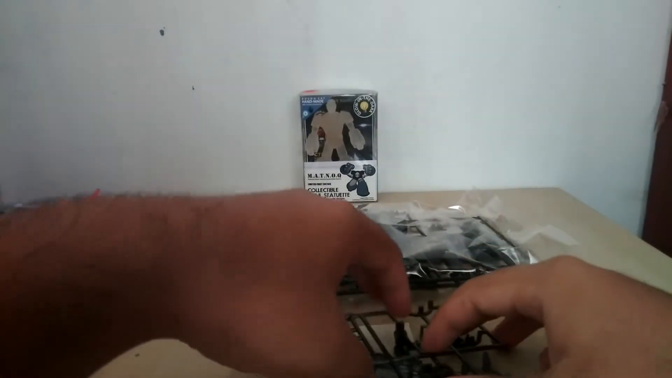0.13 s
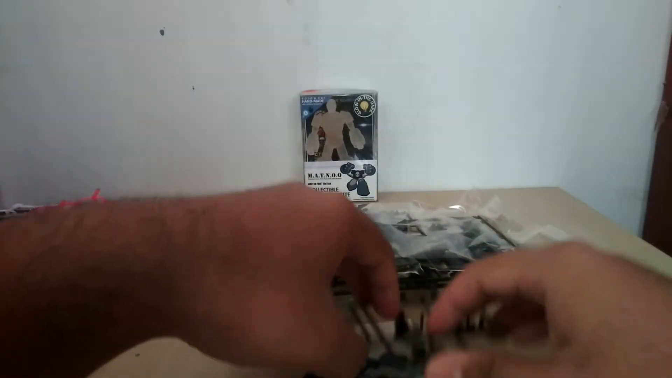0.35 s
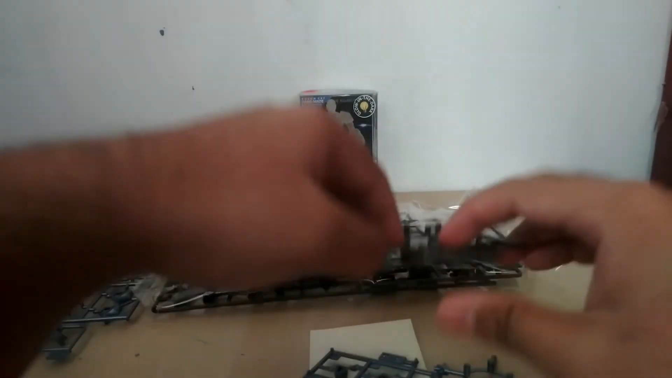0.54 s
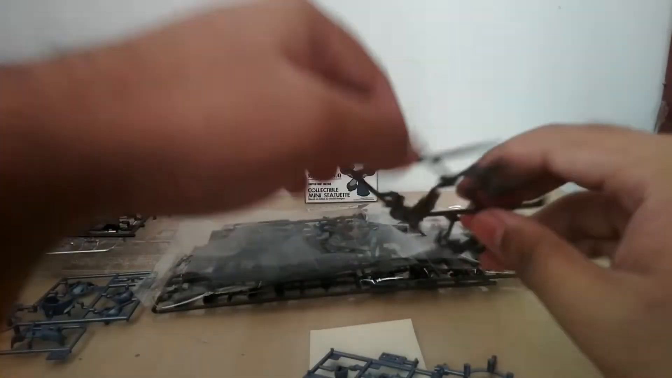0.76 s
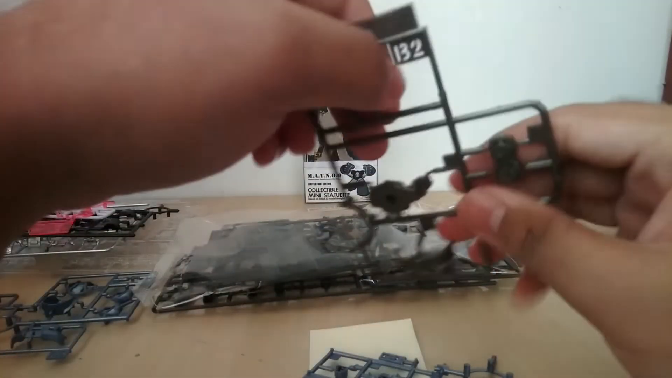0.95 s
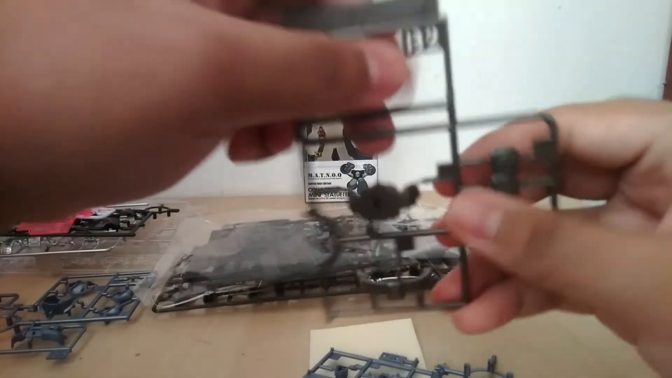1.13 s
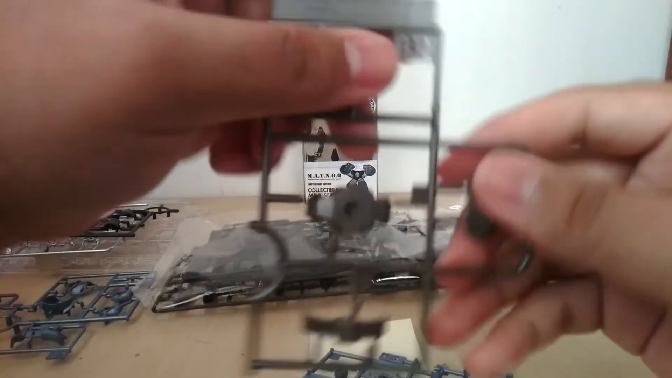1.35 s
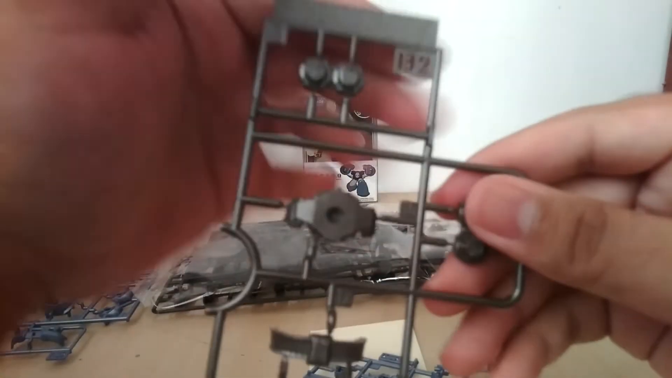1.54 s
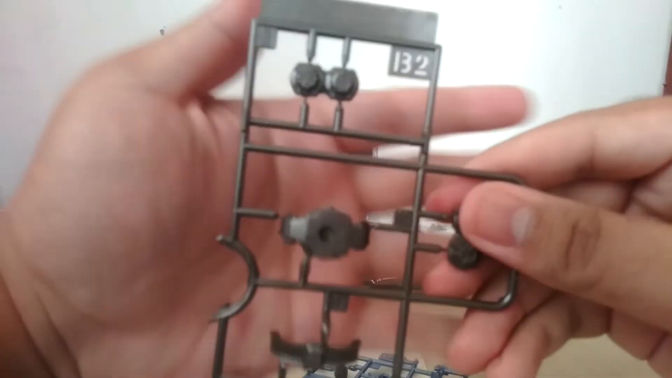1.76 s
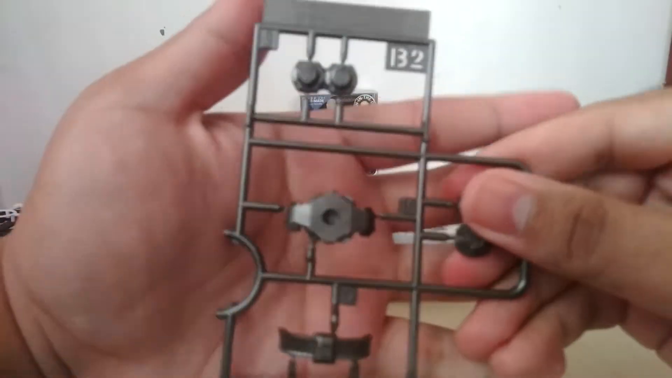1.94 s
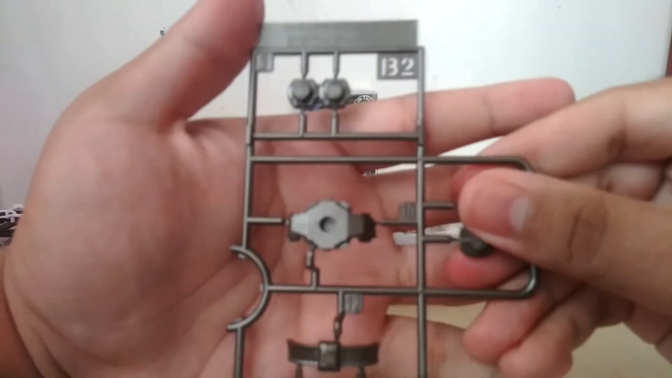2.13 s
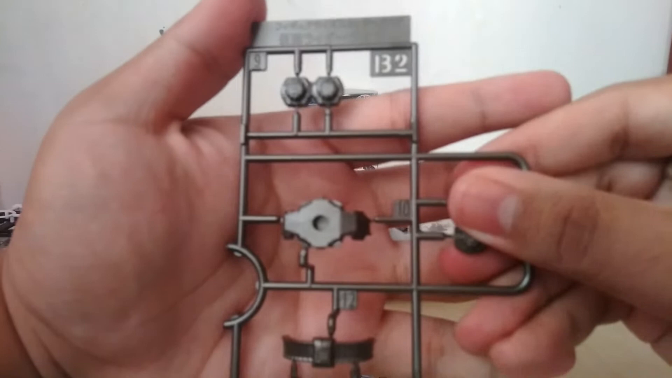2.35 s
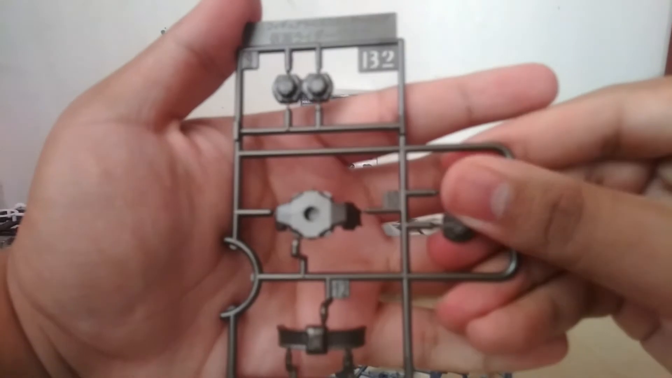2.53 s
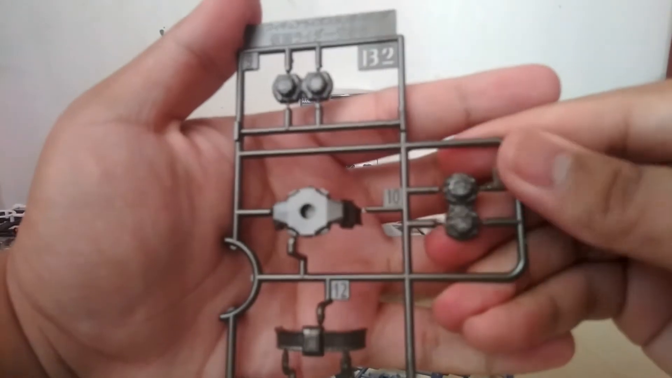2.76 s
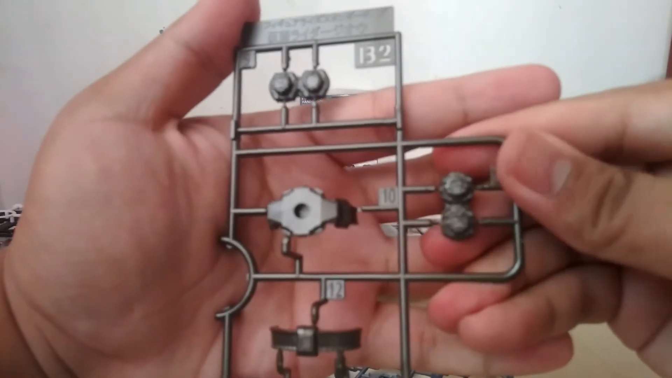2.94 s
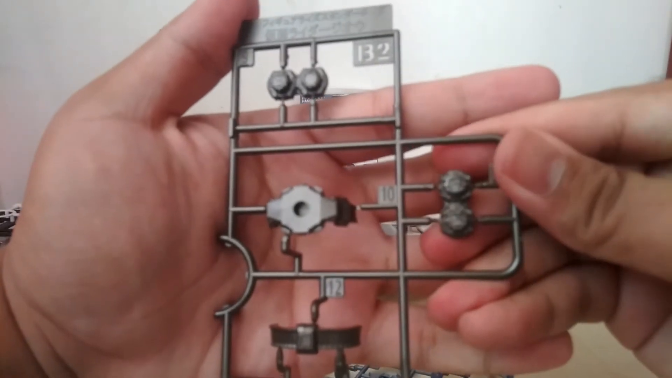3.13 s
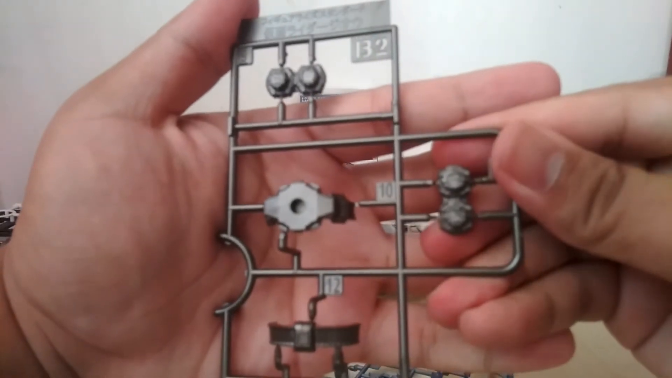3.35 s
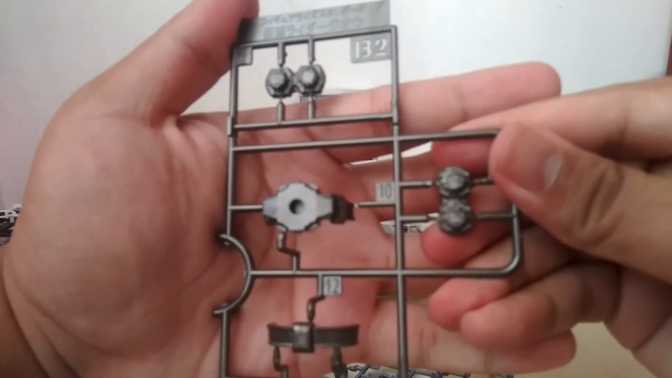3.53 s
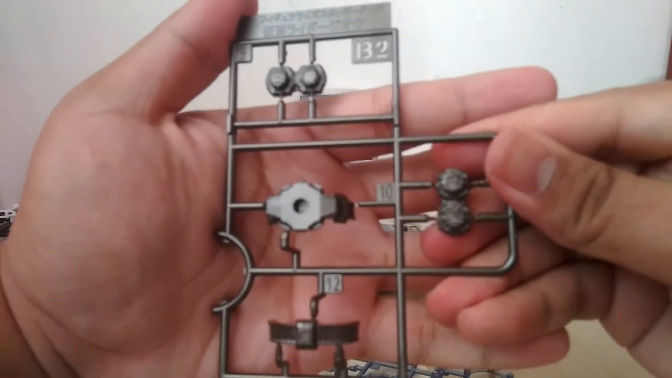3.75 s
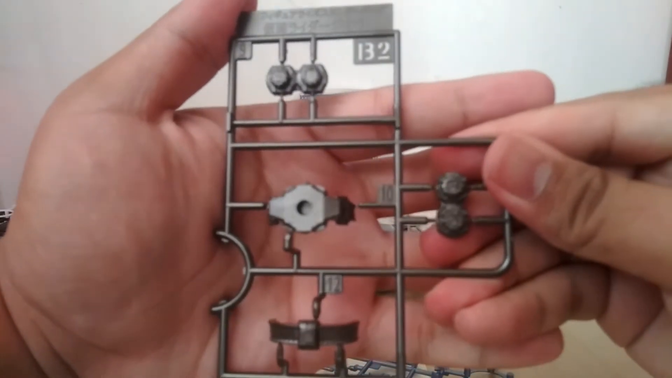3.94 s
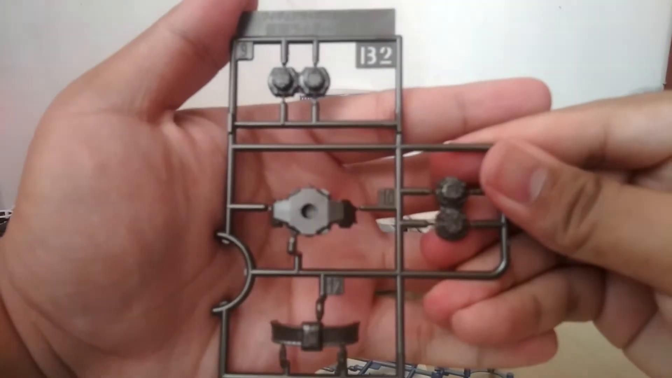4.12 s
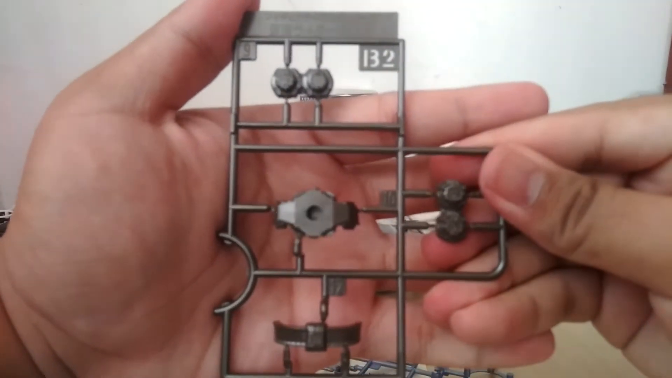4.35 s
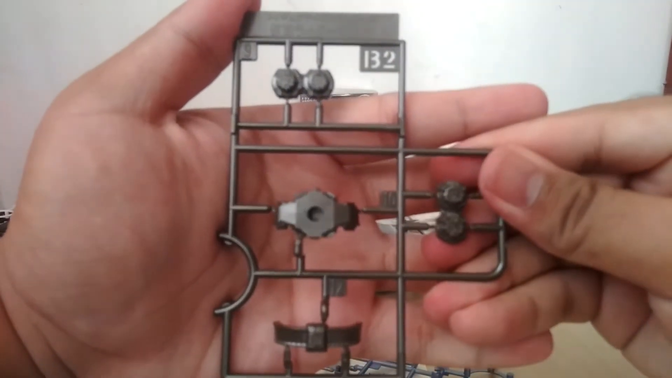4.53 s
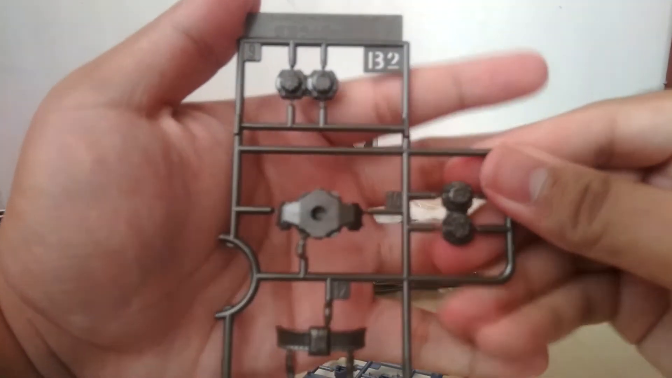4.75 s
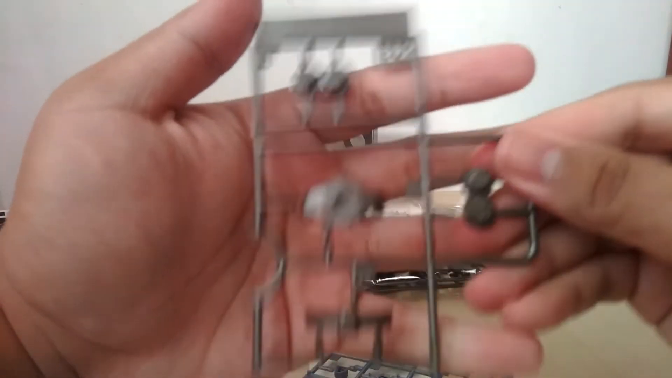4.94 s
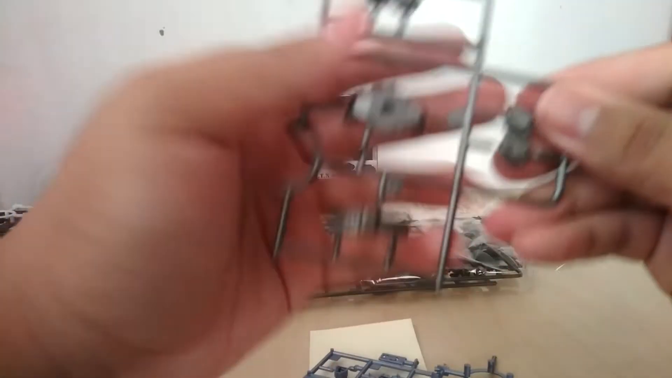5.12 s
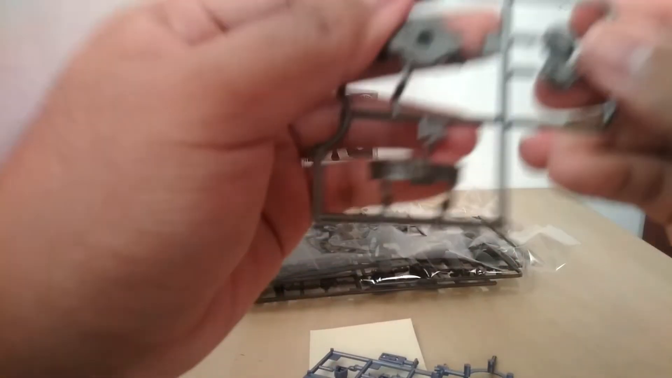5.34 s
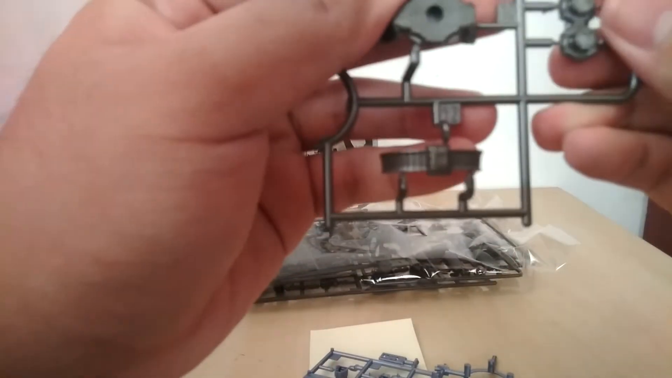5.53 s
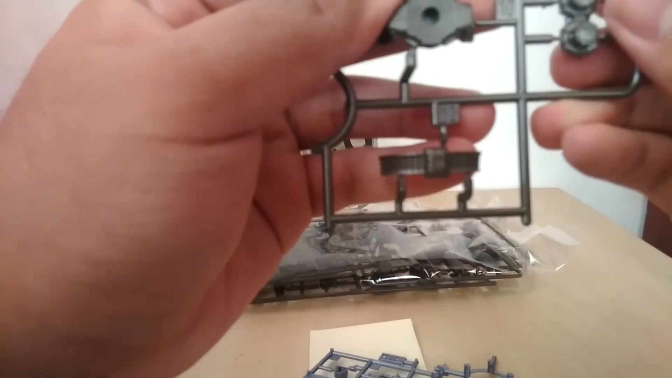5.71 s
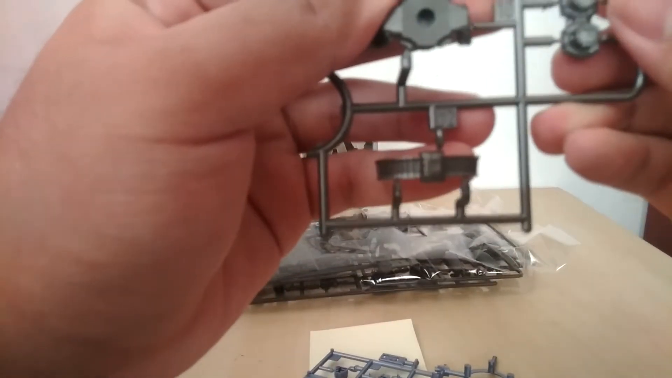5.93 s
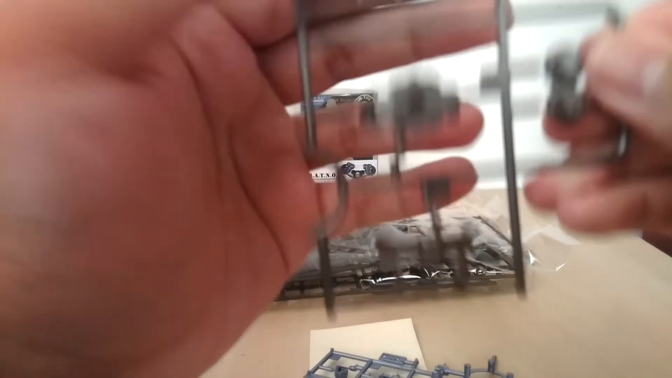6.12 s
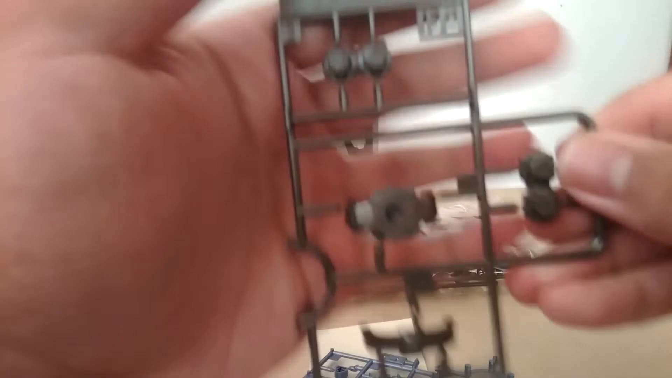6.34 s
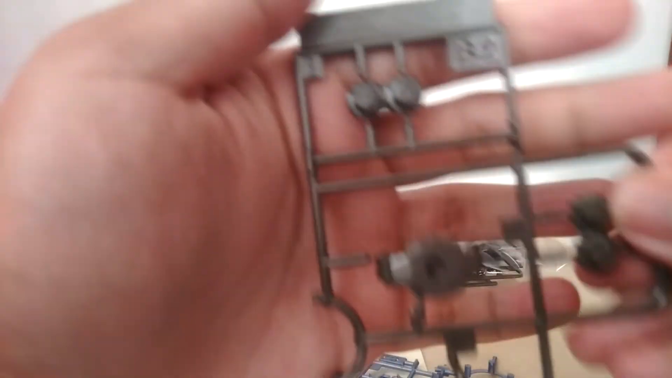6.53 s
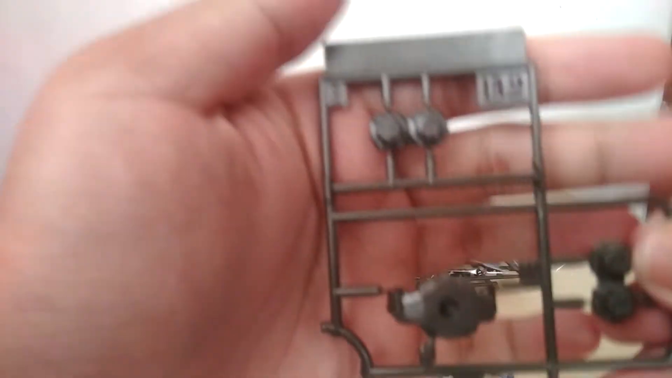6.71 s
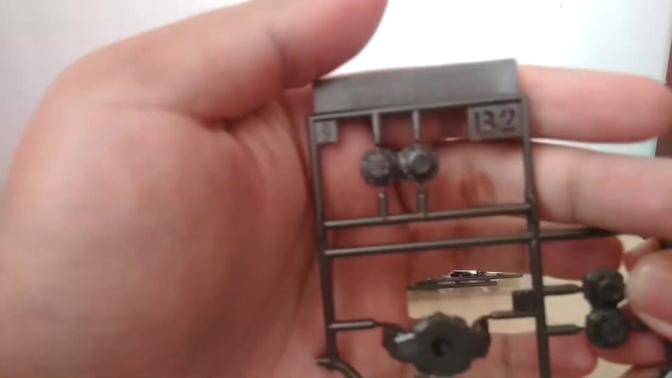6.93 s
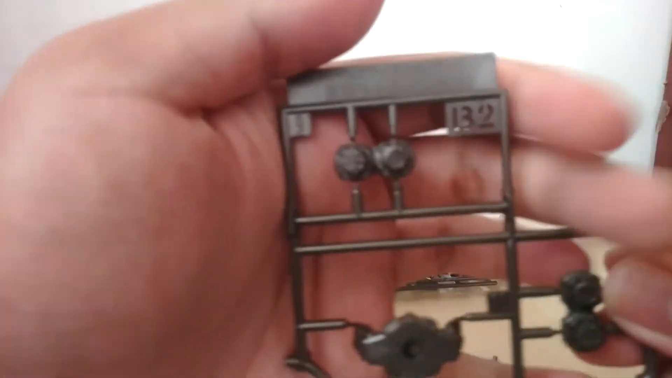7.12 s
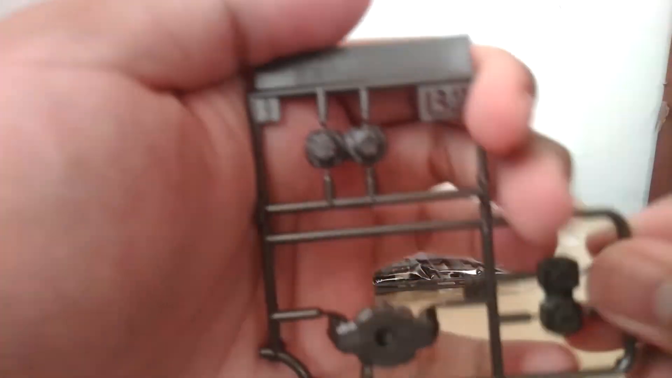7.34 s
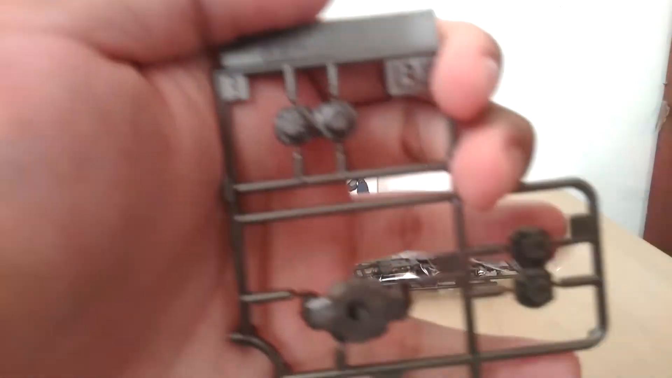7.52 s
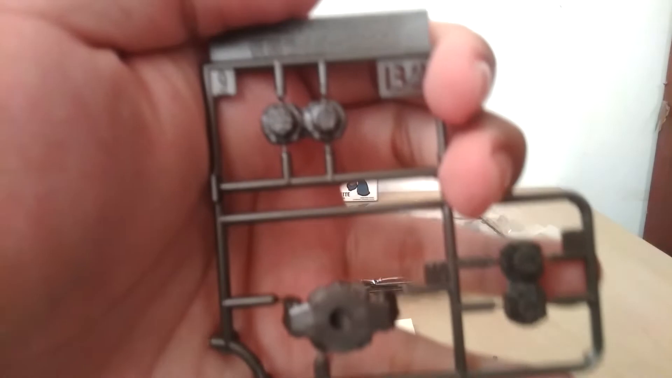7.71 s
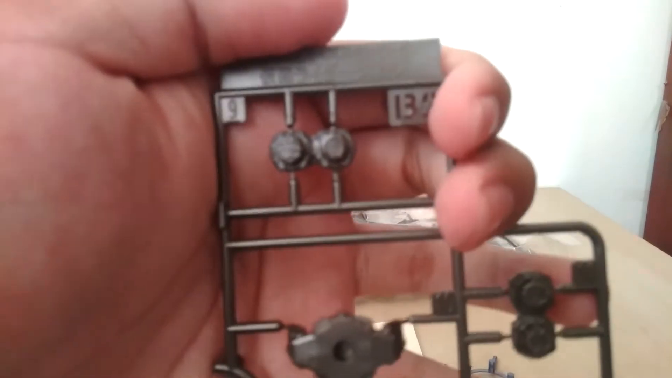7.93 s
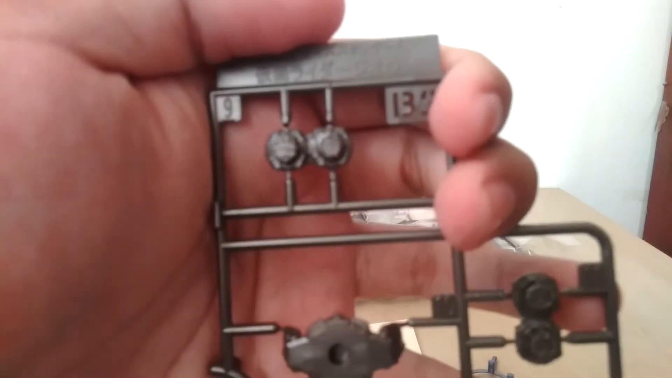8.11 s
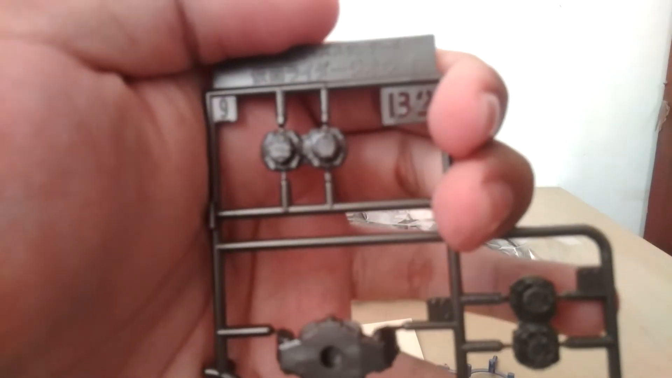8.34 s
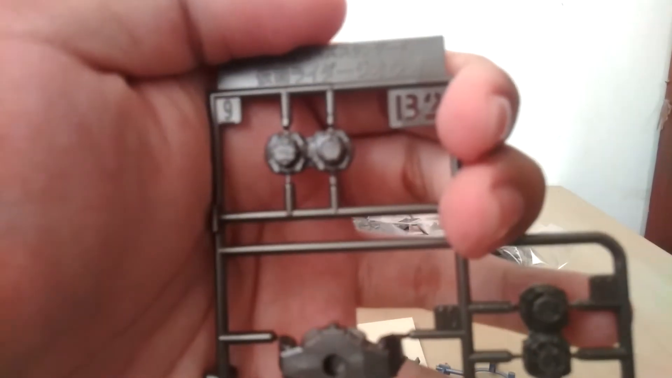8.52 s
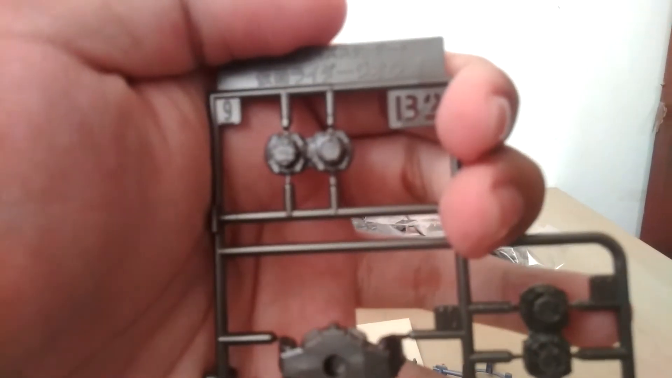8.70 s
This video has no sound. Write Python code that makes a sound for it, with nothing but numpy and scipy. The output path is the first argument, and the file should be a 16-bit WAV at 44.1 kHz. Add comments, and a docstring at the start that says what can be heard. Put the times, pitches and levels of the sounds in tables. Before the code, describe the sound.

Close to the microphone, a thin plastic parts frame clicks, scrapes and snaps free of a pile in the first second, then only small ticks and faint skin rubbing remain. Outside a small room, a bird gives falling chirps about every half second to a second over raspy chattering. Low rumble, muffled traffic and soft hiss lie beneath, growing heavier towards the end.

```python
"""Hands lift a plastic model-kit runner off a pile and turn it over close by, in a small bare room.
The frame clicks as decaying modes and noise cracks; skin rubs and scrapes as stick-slip grains.
Outside, birds chirp (gliding tones) and scold (pulses through throat resonances).
Traffic drones through the walls, slowly drawing nearer: pulsed engines, coloured noise, singing tyres.
A low rumble of resonant noise, steady hum and microphone hiss lie beneath."""
import sys
import numpy as np
from scipy import signal
from scipy.fft import rfft, irfft
from scipy.io import wavfile
from scipy.ndimage import uniform_filter1d

SR = 44100
rng = np.random.default_rng(int(sys.argv[2]) if len(sys.argv) > 2 else 0)


def wav_out(sig):
    """Save sig, one row per channel (or a flat mono array), as 16-bit PCM at SR to the path in sys.argv[1]."""
    wavfile.write(sys.argv[1], SR, np.round(np.clip(np.atleast_2d(sig).T, -1, 1) * 32767).astype(np.int16))


N = 386757
TIME = np.arange(N) / SR

# Table levels are relative, ahead of the gains in the functions.
# knocks and ticks of the frame: (time [s], treble peak [dB], body against treble [dB])
CLICKS = [(0.002, -32, -7), (0.012, -37.5, 8), (0.053, -37.5, -2), (0.198, -35, -1), (0.2025, -42.5, 11.5),
          (0.3401, -29.5, -8.5), (0.343, -26.5, -3.5), (0.604, -44.5, 12.5), (0.621, -48.5, 13),
          (0.638, -51, 10), (0.832, -43.5, -22), (0.9014, -54, -31), (0.925, -39.5, -17),
          (1.187, -35.5, -6), (1.795, -40, -28.5), (2.0016, -46, -8), (4.729, -48.5, -15),
          (4.857, -41.5, -10), (4.88, -49, -20), (5.0282, -39, -24), (5.148, -50, -18), (5.381, -39, -24),
          (5.431, -51.5, -20), (6.104, -53, -20), (6.117, -43.5, -33), (7.2185, -48, -24), (7.42, -50, -20),
          (7.477, -54, -22), (7.489, -39.5, -30), (7.501, -47, -24)]
# the frame springs free of the pile: (time [s], level [dB], ring against crack [dB])
SNAPS = [(0.4781, -29.5, -4), (0.54, -36, -1.5), (0.578, -38.5, -3)]
# a finger judders over an edge: (time [s], length [s], level [dB], brightest frequency [Hz])
SCUFFS = [(1.071, 0.023, -53, 9300), (1.256, 0.028, -63, 10900), (1.33, .018, -59, 10800),
          (1.347, 0.028, -58, 10300), (2.74, 0.074, -70, 10300), (5.233, 0.029, -70, 10600),
          (7.307, 0.017, -61, 11600)]
# soft taps against neighbouring frames: (time [s], peak [dB], low cut [Hz])
TAPS = [(0.196, -40.5, 300), (0.2019, -29.5, 400), (0.883, -51, 2120)]
# modes of the frame: (frequency [Hz], level [dB], t60 [s])
FRAME_MODES = [(1793, -12, 0.037), (2250, -9, .028), (2590, -5.5, 0.052), (2880, -7.5, 0.037),
               (3250, -7.5, .036), (4156, -8.5, 0.049), (5120, -1, 0.023), (6030, -5, 0.0462),
               (6550, -4.5, 0.031), (6980, 0.5, 0.018), (7630, -8.5, 0.0285), (8800, 6, 0.0205),
               (9400, 5, 0.0341), (10270, 6, .024), (11200, -5, 0.0192)]
# spectrum of a tap's knock: (frequency [Hz], level [dB])
TAP_COLOUR = [(400, 9), (620, -46), (900, 5.5), (1300, -4.5), (1750, -4.5), (2400, -6.5), (2900, 0),
              (3400, -2), (4400, -16), (6000, -32.5)]
CONTACT_PAN_DB = -26.5  # left minus right

# strokes of the fingers along the runner: (time [s], length [s], level [dB])
STROKES = [(0.0, 0.34, -68), (0.324, 0.052, -63), (0.55, 0.4, -72.5), (0.89, 0.043, -67.5),
           (.99, 0.12, -69), (1.2, .12, -65.5), (1.07, 0.0082, -78), (1.315, 0.052, -62.5),
           (1.5, 0.059, -74), (1.8, 0.027, -70), (2.09, 0.083, -70.5), (2.71, 0.12, -68),
           (4.74, 0.74, -71.5), (6.104, 0.066, -68.5), (6.28, 0.3, -72), (6.45, 0.08, -73),
           (6.62, 0.021, -75.5), (6.98, 0.032, -75), (7.21, 0.33, -79.5), (8.21, 0.045, -75.5)]
# the frame dragging over the pile: (time [s], length [s], level [dB])
DRAGS = [(0.0, 0.0022, -56), (0.136, 0.11, -60), (0.29, 0.16, -67.5)]
# spectrum of the rubbing: (frequency [Hz], level [dB])
RUB_COLOUR = [(1500, -2), (3000, -9.5), (5000, -11), (7000, -9.5), (9300, 1), (11000, -1), (14000, -8.5)]
# spectrum of the dragging: (frequency [Hz], level [dB])
DRAG_COLOUR = [(160, 8.5), (250, 1), (420, 16.5), (600, -1.5), (850, 6), (1300, -0.5), (1750, 4),
               (2350, -8.5), (2950, -0.5), (4400, -0.5), (7000, -8), (12000, -19.5)]
STROKE_ATTACK_SHARE, STROKE_RELEASE_S = 0.098, 0.055  # attack as a share of the stroke's length
# the closed hand creeps slightly on the frame, from GRIP_S on
GRIP_S, GRIP_SWELL_S, GRIP_DB = 6.55, 0.19, -79

# falling chirps: (time [s], starting frequency [Hz], final frequency [Hz], length [s], level [dB])
CHIRPS = [(1.025, 6190, 2880, 0.115, -63.5), (1.514, 6180, 4010, 0.079, -64.5),
          (1.976, 6120, 4290, 0.065, -63), (2.441, 6200, 3620, 0.071, -63.5),
          (3.257, 5800, 3850, 0.081, -61), (4.188, 6090, 3740, 0.11, -61.5),
          (4.764, 6130, 3750, 0.11, -61.5), (5.329, 6430, 3970, 0.071, -61.5),
          (5.823, 6390, 3700, .072, -60.5), (6.316, 6580, 4040, 0.087, -59.5),
          (6.876, 6320, 3460, 0.085, -60), (7.763, 6300, 3940, 0.056, -59), (8.34, 6520, 4100, 0.078, -64)]
# soft rising peeps: (time [s], level [dB])
PEEPS = [(2.887, -76.5), (3.797, -69), (7.419, -75)]
PEEP_START_HZ, PEEP_END_HZ, PEEP_S = 3830, 4544, .09
# harsh scolding notes: (time [s], level [dB], lower resonance against upper [dB])
SCOLDS = [(1.306, -79, -2), (1.405, -77, -4), (1.505, -72.5, -6), (1.61, -71.5, -5), (1.713, -76.5, -4.5),
          (1.825, -74, -0.5), (1.949, -80, 4.5), (2.315, -77.5, 0.5), (2.419, -69.5, -3),
          (2.511, -67, -2.5), (2.633, -72, 3.5), (2.732, -72.5, 4), (2.956, -71.5, -0.5),
          (3.053, -69, -2.5), (3.152, -66, -4), (3.253, -71, -4), (3.355, -73.5, -7), (3.482, -85.5, 4),
          (4.082, -73.5, -16), (4.18, -72.5, -5), (4.284, -69.5, -4), (4.402, -72.5, -1.5),
          (4.527, -71.5, -2.5), (4.638, -72, 0), (4.74, -70, 0.5), (5.161, -74, -2), (5.252, -70.5, -2),
          (5.354, -66.5, -4), (5.462, -70, -3), (5.565, -70.5, 0), (5.668, -72, 0.5), (5.78, -75, 2),
          (5.865, -83, -9), (5.962, -77, -1.5), (6.082, -77, 2), (6.731, -78, -16), (6.843, -70, -19),
          (6.94, -68.5, -11), (7.034, -66.5, -15), (7.138, -71.5, -11), (7.253, -71, -2),
          (7.377, -71.5, -1), (7.499, -76, 4), (7.69, -73, -1.5), (7.813, -67, -11), (7.909, -67.5, -10),
          (8.027, -68.5, -1.5), (8.152, -66, -3.5), (8.254, -64, -3)]
SCOLD_HZ, SCOLD_SAG_HZ_PER_DB = 3415, 22  # the voice sinks as its lower resonance takes over
RASP_S, RASP_LENGTH_S, RASP_HZ, RASP_DB = 8.59, 0.17, 3916, -63.5  # one drawn-out rasp
# far bird: (time [s], starting frequency [Hz], held frequency [Hz], length [s], level [dB])
FAR_CALLS = [(1.417, 1150, 1261, 0.72, -92), (3.084, 1100, 1295, 0.39, -79.5),
             (4.693, 1120, 1374, 0.67, -86), (6.253, 1150, 1383, 0.47, -79)]

# low sounds and traffic: (time [s], low rumble [dB], road roar [dB], tyres [dB])
RUMBLE_AND_ROAD = [(0.0, -56, -66.5, -75.5), (.6, -54, -66, -68.5), (.95, -59, -75, -80.5),
                   (1.07, -62.5, -75.5, -80), (1.47, -68.5, -79, -81), (1.75, -63.5, -78, -80.5),
                   (2.42, -62.5, -72.5, -83), (2.56, -53.5, -68, -75.5), (2.96, -63.5, -73, -79.5),
                   (3.4, -51.5, -70, -76), (4.4, -56, -65.5, -75.5), (5.35, -51, -63.5, -74),
                   (5.6, -54.5, -64, -74.5), (6.1, -54, -62, -77), (6.32, -44, -62.5, -71.5),
                   (6.53, -48.5, -58, -68.5), (6.7, -50.5, -67.5, -74.5), (7.25, -50.5, -67, -70),
                   (7.8, -47, -64.5, -68), (8.15, -52, -66, -68), (8.35, -52, -60.5, -64.5),
                   (8.65, -50, -55, -63.5)]
# engines droning close by: (time [s], length [s], mean firing rate [Hz], level [dB])
ENGINES = [(0.0, 0.69, 55.94, -42.5), (3.271, 1.88, 60.75, -49.5), (6.727, 0.34, 57.38, -44.5),
           (8.527, 0.14, 52.84, -39)]
ENGINE_ATTACK_S, ENGINE_RELEASE_S = 0.022, 0.17
# spectrum of the road roar: (frequency [Hz], level [dB])
ROAR_COLOUR = [(120, -23), (148, -3), (170, 3), (203, -7.5), (237, 0), (272, -4.5), (338, -2), (385, -7),
               (446, -5.5), (520, -14), (620, -19), (800, -21.5)]
# spectrum of the tyres: (frequency [Hz], level [dB])
TYRE_COLOUR = [(530, 5), (620, -6.5), (750, 3.5), (900, 2.5), (1080, -2), (1280, -2), (1650, -3.5),
               (2150, -6), (2700, -9), (3600, -11), (6000, -18)]
GROWL_HZ = 56.86  # mean firing rate of the engines in the road roar
# vehicles revving further off, following their strongest harmonic:
# (time [s], length [s], starting frequency [Hz], final frequency [Hz], level [dB])
REVS = [(3.847, 0.32, 170, 174.7, -67), (4.219, 0.29, 270, 280.6, -67.5), (5.095, 0.23, 388.6, 351.4, -67),
        (5.573, 0.26, 330, 373, -66), (5.655, 0.48, 224, 236, -66.5), (5.923, 0.42, 306.7, 337, -67),
        (6.425, 0.123, 273.3, 294.5, -62.5), (8.272, 0.13, 214, 248.7, -62), (8.353, 0.44, 348, 387.6, -62)]
REV_ATTACK_S, REV_RELEASE_S = 0.069, 0.046
# singing tyre tread of an approaching vehicle:
# (time [s], centre frequency [Hz], level [dB], octave against centre [dB])
TREAD_WHINE = [(6.3, 1091, -87, -14), (7.0, 1101, -71.5, -15), (8.25, 1139, -68, -29),
               (8.45, 1133, -68, -1), (8.77, 1103, -64.5, -2.5)]

# spectrum of the low rumble, probably of handling: (frequency [Hz], level [dB])
RUMBLE_COLOUR = [(45, -11.5), (56, -21.5), (70, -5.5), (82, -2.5), (98, -11), (120, -19), (145, -24)]
BOOM_HZ, BOOM_WIDTH_HZ = 57.95, 16  # lowest mode of the room
# spectrum of the room's hum: (frequency [Hz], level [dB])
HUM_COLOUR = [(130, -12), (168, 12.5), (215, -6), (430, -12), (540, -8), (680, -6)]
# spectrum of the microphone's hiss: (frequency [Hz], level [dB])
HISS_COLOUR = [(880, -50), (1500, -12.5), (2550, -1), (2970, -2), (3330, -6), (3880, -6), (7120, -3.5),
               (9830, -2.5), (13600, -6.5), (14500, -8.5)]
HUM_DB, HISS_DB = -79.5, -78.5
TOP_HZ = 14300  # upper limit of the sound


def undb(db):
    """Decibels to gain."""
    return 10 ** (np.asarray(db) / 20)


def unit(x):
    """Scale to rms 1."""
    return x / np.sqrt(np.mean(x ** 2) + 1e-20)


def curves(table):
    """Each column of a table, joined by straight lines in time."""
    s, *columns = np.transpose(table)
    return [np.interp(TIME, s, c) for c in columns]


def colour(x, points):
    """Shape a spectrum by (Hz, dB) points, falling steeply beyond them; rms 1."""
    hz, db = np.transpose(points)
    size = x.shape[-1]
    log_hz = np.log(np.maximum(np.fft.rfftfreq(size, 1 / SR), 1))
    beyond = np.maximum(np.log(hz[0]) - log_hz, 0) + np.maximum(log_hz - np.log(hz[-1]), 0)
    gain = undb(np.interp(log_hz, np.log(hz), db) - 40 * beyond)
    return unit(irfft(rfft(x) * gain, size))


def resonate(x, hz, width_hz):
    """One resonance, gain 1 at its centre."""
    return signal.lfilter(*signal.iirpeak(hz, hz / width_hz, fs=SR), x)


def walk(rate_hz, size=N):
    """Smooth random wandering, spread near 1."""
    k = max(int(SR / rate_hz), 1)
    steps = np.repeat(rng.standard_normal(size // k + 1), k)
    return uniform_filter1d(steps, k)[:size]


def band(phase, width_hz):
    """A narrow band of noise that follows a running phase."""
    return walk(width_hz) * np.sin(phase) + walk(width_hz) * np.cos(phase)


def pan(db):
    """Left and right gains for a level difference; their mean is 1."""
    gains = undb(np.array([[db], [-db]]) / 2)
    return gains / gains.mean()


def air(likeness):
    """Stereo noise whose channels are partly alike."""
    c = np.clip(likeness, 0, 1)
    return np.sqrt(c) * rng.standard_normal(N) + np.sqrt(1 - c) * rng.standard_normal((2, N))


def add(out, s, sound):
    """Mix a sound in at a given time."""
    i = max(int(s * SR), 0)
    out[..., i:i + sound.shape[-1]] += sound[..., :N - i]


def gesture(s, length_s, attack_s, release_s):
    """Attack, hold and a fading release."""
    attack = np.clip((TIME - s) / attack_s, 0, 1)
    return attack * np.exp(-np.clip((TIME - s - length_s) / release_s, 0, 30))


def split(sound, hz=6200):
    """Part a sound into its body and its treble."""
    filters = [signal.butter(7, hz, kind, fs=SR, output="sos") for kind in ("low", "high")]
    return [signal.sosfilt(sos, sound) for sos in filters]


def room(x, t60_s, likeness):
    """Diffuse reflections of the small room, with unit energy in each channel."""
    t = TIME[:SR // 2]
    tail = air(likeness)[:, :len(t)] * undb(-60 * t / t60_s) * np.clip(t / .006, 0, 1)
    tail /= np.sqrt(np.sum(tail ** 2, axis=1, keepdims=True))
    return signal.fftconvolve(x[None], tail, axes=1)[:, :N]


def plastic(treble_db=-2, body_gain_db=-4.5, tap_db=0, room_db=-10):
    """Clicks, snaps, scuffs and soft taps of the frame; their bright parts beam at the right microphone."""
    out = np.zeros((2, N))
    for s, db, body_db in CLICKS:
        body, treble = click(body_db)
        sound = undb(body_gain_db) * body + undb(treble_db) * pan(CONTACT_PAN_DB) * treble
        add(out, s, undb(db) * sound)
    for s, db, ring_db in SNAPS:
        add(out, s, undb(db) * snap(ring_db))
    for s, length_s, db, hz in SCUFFS:
        add(out, s, undb(db) * pan(CONTACT_PAN_DB) * scuff(length_s, hz))
    for s, db, low_cut_hz in TAPS:
        add(out, s, undb(db + tap_db) * pan(-5.5) * tap(low_cut_hz))
    return out + undb(room_db) * pan(-3.5) * room(out.mean(0), t60_s=0.37, likeness=0.14)


def frame_ring(t, scatter_db, tilt_db=0):
    """The frame's modes; the grip changes how strongly each one rings and detunes it slightly."""
    hz, db, t60_s = np.transpose(FRAME_MODES)[:, :, None]
    strength, detune, phase = rng.standard_normal((3, len(FRAME_MODES), 1))
    tilt = tilt_db * np.log2(hz / hz.mean())
    size = undb(db + tilt + scatter_db * strength - 60 * t / t60_s)
    return np.sum(size * np.sin(2 * np.pi * (hz * (1 + 0.0036 * detune) * t + phase)), axis=0)


def click(body_db, crack_s=0.0021, crack_db=2, slip_db=6):
    """One contact rings the frame's modes and cracks briefly in a burst of tiny slips."""
    t = TIME[:SR // 16]
    slips = np.exp(-t / crack_s) * undb(slip_db * walk(2250, size=len(t)))
    crack_colour = [(600, -37), (2500, -15), (6000, -8.5), (9700, 10.5), (14000, 2.5)]
    crack = colour(rng.standard_normal((2, len(t))) * slips, crack_colour)
    ring = unit(frame_ring(t, scatter_db=5.5, tilt_db=11.5))
    body, treble = split(ring + undb(crack_db) * crack)
    size = 1 / np.abs(treble).max()
    return size * undb(body_db) * unit(body) * np.std(treble), size * treble


def snap(ring_db, lag_s=0.00095, crack_s=0.0007, build_s=.0005, body_db=-1):
    """A bright crack as the frame slips free; an instant later all its modes ring."""
    t = TIME[:SR // 12]
    late = np.maximum(t - lag_s, 0)
    crack_colour = [(1500, -16.5), (3000, -4.5), (10000, 3.5), (14000, -6.5)]
    crack = colour(rng.standard_normal((2, len(t))), crack_colour) * np.exp(-t / crack_s)
    # countless short modes buzz between the strong ones, and the fingers damp them all
    buzz_colour = [(1000, -15.5), (2500, -1.5), (7000, 5.5), (10500, -0.5), (13000, -17)]
    buzz = colour(rng.standard_normal(len(t)), buzz_colour) * np.exp(-late / 0.0059)
    modes = frame_ring(late, scatter_db=3.0)
    ring = (modes / np.std(modes[:SR // 200]) + 2 * buzz) * (1 - np.exp(-late / build_s))
    ring = ring * np.exp(-late / .009)
    body, treble = split(2 * crack + undb(ring_db) * ring / np.std(ring[:SR // 200]))
    return undb(body_db) * body + pan(CONTACT_PAN_DB) * treble


def scuff(length_s, hz, width_hz=4200, slip_db=5):
    """A quick run of uneven slips with a tint of its own."""
    size = int(length_s * SR)
    slips = rng.standard_normal(size) * undb(slip_db * walk(900, size=size)) * np.hanning(size) ** .5
    return unit(resonate(resonate(slips, hz, width_hz), hz, 2 * width_hz))


def tap(low_cut_hz, decay_s=0.0061, ring_db=-1.0):
    """A soft contact: a dull knock that rings only the frame's lowest mode; peak 1."""
    t = TIME[:SR // 10]
    knock = colour(rng.standard_normal((2, len(t))), TAP_COLOUR) * np.exp(-t / decay_s)
    hz, _, t60_s = FRAME_MODES[0]
    ring = undb(ring_db - 60 * t / t60_s) * np.sin(2 * np.pi * hz * t)
    sound = signal.sosfilt(signal.butter(4, low_cut_hz, "high", fs=SR, output="sos"), knock + ring)
    return sound / np.abs(sound).max()


def fingers(rub_db=-1.0, tick_db=-12, drag_db=4.5, pressure_db=3.5):
    """Skin rubs and catches along the runner, and at first the runner scrapes across the pile."""
    grip = undb(GRIP_DB) * np.clip((TIME - GRIP_S) / GRIP_SWELL_S, 0, 1)
    effort = strokes(STROKES) * undb(pressure_db * walk(22)) + grip
    skin = undb(rub_db) * skin_grain()
    rub = (skin + undb(tick_db) * ticks()) * effort * pan(-30.0)
    pull = undb(drag_db) * strokes(DRAGS) * undb(3.9 * walk(69.5))
    drag = colour(crackle(catch_db=-29), DRAG_COLOUR) * pull * pan(-2)
    return rub + drag


def strokes(table):
    """Sliding effort: every stroke takes hold and slides to rest, the longer ones starting more gently."""
    return sum(undb(db) * gesture(s, length_s, STROKE_ATTACK_SHARE * length_s, STROKE_RELEASE_S)
               for s, length_s, db in table)


def skin_grain(count=14, width_hz=600, patchy_db=1.0, tint_db=2.5):
    """Each narrow band of the rubbing flares as the skin slips, and the tint shifts as the finger travels."""
    grains = crackle()
    bands = sum(resonate(grains, hz, width_hz) * undb(patchy_db * walk(90) + tint_db * walk(12))
                for hz in np.linspace(6500, TOP_HZ, count))
    return colour(bands, RUB_COLOUR)


def crackle(catch_rate_hz=220, catch_db=-4, smear_s=0.0003):
    """Fine sliding grains in noise, and rarer catches that each give a short rasp."""
    t = TIME[:SR // 100]
    rasp = rng.standard_normal(len(t)) * np.exp(-t / smear_s)
    catches = signal.fftconvolve(friction(catch_rate_hz, spread_db=11.5), rasp)[:N]
    return friction(rate_hz=2300, spread_db=-2.0) + 4.7 * air(0) + undb(catch_db) * unit(catches)


def friction(rate_hz, spread_db):
    """Chance stick-slip grains of uneven size; rms 1."""
    grains = (rng.random(N) < rate_hz / SR) * rng.standard_normal(N)
    return unit(grains * undb(spread_db * np.minimum(rng.exponential(size=N), 4)))


def ticks(count=130, body_db=-18, scatter_db=3):
    """Small chance ticks of the frame as it shifts under the skin; rms 1."""
    out = np.zeros(N)
    for when, size in rng.random((count, 2)):
        tick = sum(click(body_db))[0]
        add(out, when * N / SR, undb(scatter_db * (2 * size - 1)) * tick)
    return unit(out)


def birds(whistle_db=-3.0, chatter_db=1.5, direct_db=-6, room_db=0.5):
    """Chirps over runs of scolding and a far caller, heard largely by way of the walls."""
    song = np.zeros(N)
    for s, start_hz, end_hz, length_s, db in CHIRPS:
        add(song, s, undb(db + whistle_db) * whistle(start_hz, end_hz, length_s))
    for s, db in PEEPS:
        add(song, s, undb(db) * whistle(PEEP_START_HZ, PEEP_END_HZ, PEEP_S, bend=0.56, waver=0.071))
    for s, db, lower_db in SCOLDS:
        hz = SCOLD_HZ - SCOLD_SAG_HZ_PER_DB * lower_db
        add(song, s, undb(db + chatter_db) * scold(hz, lower_db))
    rasp = scold(RASP_HZ, lower_db=-23, length_s=RASP_LENGTH_S, lower_ratio=0.84, upper_width_hz=930)
    add(song, RASP_S, undb(RASP_DB) * rasp)
    for s, start_hz, held_hz, length_s, db in FAR_CALLS:
        add(song, s, undb(db) * far_call(start_hz, held_hz, length_s))
    near = room(song, t60_s=0.018, likeness=0.13)
    walls = room(song, t60_s=0.34, likeness=0.033)
    return pan(2.3) * (undb(direct_db) * near + undb(room_db) * walls)


def whistle(start_hz, end_hz, length_s, bend=.8, waver=0.03, trill=0.016, trill_hz=310):
    """A gliding note; the steeper it falls, the more waver and a fast trill roughen it."""
    u = np.arange(int(length_s * SR)) / (length_s * SR)
    depth = np.clip(start_hz / end_hz - .6, 0, 1)
    shake = waver * walk(1400, size=len(u)) + trill * np.sin(2 * np.pi * trill_hz * length_s * u)
    hz = (start_hz + (end_hz - start_hz) * u ** bend) * (1 + depth * shake)
    swell = np.interp(u, [0, .08, .35, .7, 1], [0.13, 0.53, 0.74, 0.57, 0.29])
    swell = swell * undb(4.3 * walk(250, size=len(u)))
    return unit(swell * np.sin(2 * np.pi * np.cumsum(hz) / SR))


def scold(hz, lower_db, length_s=0.042, pulse_hz=430, rough=.16, lower_ratio=0.81,
          upper_width_hz=860, lower_width_hz=900, overtone_db=-19):
    """A rasping note: irregular pulses through two throat resonances and a faint third above."""
    u = np.arange(int(length_s * SR)) / (length_s * SR)
    cycles = np.cumsum(pulse_hz * (1 + rough * walk(600, size=len(u)))) / SR
    pulses = unit(np.diff(np.floor(cycles), prepend=0))
    throat = [(hz, upper_width_hz, 0), (hz * lower_ratio, lower_width_hz, lower_db),
              (hz * 1.9, 1800, overtone_db)]
    voice = 0
    for f, width_hz, db in throat:
        breath = pulses + rng.standard_normal(len(u))  # turbulence stirs each resonance on its own
        voice = voice + undb(db) * unit(resonate(resonate(breath, f, width_hz), f, width_hz))
    return voice * unit(np.sin(np.pi * u) ** 0.28)


def far_call(start_hz, held_hz, length_s, glide_s=0.058):
    """A thin tone that slides up to its pitch and fades there."""
    t = TIME[:int(length_s * SR)]
    glide = held_hz + (start_hz - held_hz) * np.exp(-t / glide_s)
    hz = glide * (1 + 0.049 * walk(260, size=len(t)))
    swell = np.interp(t / length_s, [0, .2, .4, 1], [0.17, 1.0, 0.32, 0.15])
    return unit(swell * np.sin(2 * np.pi * np.cumsum(hz) / SR))


def traffic(roar_gain_db=-1, tyre_gain_db=0.0, surge_db=3.5, growl_db=-7, drift=.025):
    """Engine notes, road roar and tyres."""
    _, roar_db, tyre_db = curves(RUMBLE_AND_ROAD)
    drone = sum(undb(db) * gesture(s, length_s, ENGINE_ATTACK_S, ENGINE_RELEASE_S) * engine(hz)
                for s, length_s, hz, db in ENGINES)
    # the engines' harmonics drift in and out of the room's resonances
    cycles = np.cumsum(GROWL_HZ * (1 + drift * walk(3))) / SR
    growl = room(firings(cycles), t60_s=0.26, likeness=0.46)
    roar = colour(air(0.76) + undb(growl_db) * growl, ROAR_COLOUR)
    roar = roar * undb(roar_db + roar_gain_db + surge_db * walk(7.7))
    tyres = colour(air(0.027), TYRE_COLOUR) * undb(tyre_db + tyre_gain_db + .5 * walk(17))
    return pan(-1.486) * (drone + roar + tyres)


def engine(hz, wobble=0.01477, third_db=-24, growl_db=-26, throb_db=4.5):
    """An uneven engine note whose firings add a faint growl."""
    cycles = np.cumsum(hz * (1 + wobble * walk(25))) / SR
    note = np.sin(2 * np.pi * cycles) + undb(third_db) * np.sin(6 * np.pi * cycles)
    drone = unit(note) * undb(throb_db * walk(22))
    return drone + undb(growl_db) * colour(firings(cycles), ROAR_COLOUR)


def firings(cycles, scatter_db=3):
    """One pulse of uneven strength for each engine cycle; rms 1."""
    return unit(np.diff(np.floor(cycles), prepend=0) * undb(scatter_db * walk(60)))


def revs(waver=0.01532, width_hz=170, gas_db=3):
    """Far exhausts swell and glide: one strong harmonic in rushing gas, smeared by the room."""
    out = np.zeros(N)
    for s, length_s, start_hz, end_hz, db in REVS:
        hz = np.interp(TIME, [s, s + length_s], [start_hz, end_hz]) * (1 + waver * walk(25))
        phase = 2 * np.pi * np.cumsum(hz) / SR
        exhaust = unit(np.sin(phase) + undb(gas_db) * band(phase, width_hz))
        out += undb(db) * exhaust * gesture(s, length_s, REV_ATTACK_S, REV_RELEASE_S)
    return pan(-2.1) * (undb(-4.5) * out + undb(-0.5) * room(out, t60_s=0.19, likeness=0.89))


def tread(width_hz=240, lower_ratio=0.84, lower_width_hz=110, lower_db=-2):
    """Uneven tread blocks sing as two close bands and an octave of varying strength."""
    hz, db, octave_db = curves(TREAD_WHINE)
    phase = 2 * np.pi * np.cumsum(hz) / SR
    sides = []
    for _ in range(2):
        lower = undb(lower_db) * band(lower_ratio * phase, lower_width_hz)
        octave = undb(octave_db) * band(2 * phase, 2 * width_hz)
        sides.append(band(phase, width_hz) + lower + octave)
    return np.array(sides) * undb(db) * (TIME > TREAD_WHINE[0][0])


def rumble(boom_db=1.0, gain_db=1.0):
    """A low rumble, probably of handling: coloured noise and the room's lowest mode."""
    level_db, _, _ = curves(RUMBLE_AND_ROAD)
    boom = resonate(rng.standard_normal(N), BOOM_HZ, BOOM_WIDTH_HZ)
    boom = unit(resonate(boom, BOOM_HZ, BOOM_WIDTH_HZ))
    low = undb(gain_db) * colour(air(1.0), RUMBLE_COLOUR) + undb(boom_db) * boom
    return pan(-1.486) * low * undb(level_db + 1.3 * walk(13))


def hum():
    """The room's steady hum: low coloured noise, mostly alike in both channels."""
    return undb(HUM_DB) * colour(air(0.79), HUM_COLOUR)


def hiss(gain_db=1.7):
    """The microphone's own noise, nearly independent in each channel."""
    return undb(HISS_DB + gain_db) * colour(air(0.026), HISS_COLOUR)


def scene():
    """Handling, birds and traffic over rumble, hum and hiss."""
    outside = birds() + traffic() + revs() + tread()
    return plastic() + fingers() + outside + rumble() + hum() + hiss()


def record(dry):
    """A steep low-pass ends the sound at TOP_HZ."""
    return signal.sosfilt(signal.ellip(10, .2, 70, TOP_HZ, fs=SR, output="sos"), dry)


dry = scene()
out = record(dry)
wav_out(out)
```